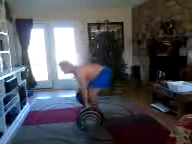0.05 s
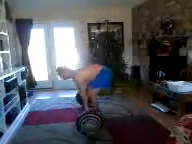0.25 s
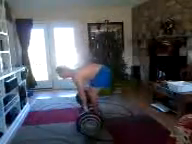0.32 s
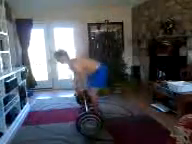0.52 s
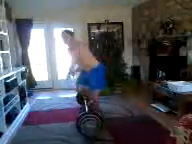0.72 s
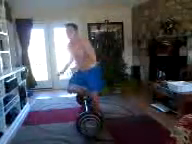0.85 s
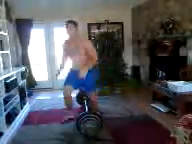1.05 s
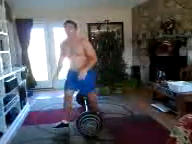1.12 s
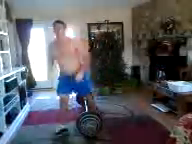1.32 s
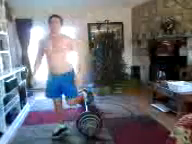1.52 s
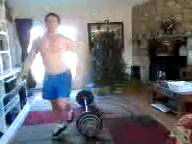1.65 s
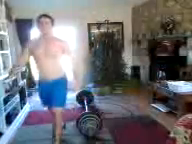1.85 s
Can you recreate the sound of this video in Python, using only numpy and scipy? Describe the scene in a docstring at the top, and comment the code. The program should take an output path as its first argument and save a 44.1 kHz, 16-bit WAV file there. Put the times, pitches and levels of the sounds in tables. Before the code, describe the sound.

A loaded barbell lands hard on a matted floor, booming as loose iron plates clatter, ring and briefly squeal, then soft footfalls and a shoe slap in a quiet living room, through a narrow, slightly overloaded microphone.

```python
"""A loaded barbell is dropped on a matted floor: its loose iron plates clash as chattering noise bursts
and ring as decaying, wavering modes, with brief squeals and dull scuffs on the sleeves.
The floor booms as damped low sines with a noise burst. A shoe slaps down among soft footfalls, also noise
bursts. Faint noise is the quiet of a live living room, whose echo is decaying noise.
A narrow-band microphone rounds off the loudest peaks; a few thin clicks are added."""
import sys
import numpy as np
from scipy import signal
from scipy.fft import rfft, irfft, next_fast_len
from scipy.io import wavfile
from scipy.ndimage import map_coordinates

SR = 44100
rng = np.random.default_rng(int(sys.argv[2]) if len(sys.argv) > 2 else 0)


def to_wav(s):
    """Save 16-bit WAV."""
    ch = np.atleast_2d(s).T  # columns
    pcm = np.round(np.clip(ch, -1, 1) * 32767)  # PCM
    wavfile.write(sys.argv[1], SR, pcm.astype(np.int16))


N = 83790
T = np.arange(N) / SR  # time in seconds


def amp(db):
    """Decibel law: level to amplitude gain."""
    return 10 ** (np.asarray(db) / 20)


def unit(x):
    """Normalisation: x scaled to rms 1."""
    return x / np.sqrt(np.mean(x ** 2) + 1e-20)


def along(points, hz):
    """Spectral envelope: (Hz, value) points interpolated on a log frequency axis."""
    f, v = np.transpose(points)
    return np.interp(np.log(hz + 1), np.log(f + 1), v)


def fade(t, t60):
    """Exponential damping: a fall of 60 dB in t60 seconds."""
    return np.exp(-np.log(1000) * t / t60)


def onset(seconds):
    """Exponential build-up: a rise from 0 towards 1 with this time constant."""
    return 1 - np.exp(-T / seconds)


def filtered(x, gain):
    """Linear filtering: the spectrum of x times a gain that depends on frequency."""
    m = next_fast_len(N + SR // 4)
    hz = np.fft.rfftfreq(m, 1 / SR)
    return irfft(rfft(x, m) * gain(hz), m)[:N]


def noise(level):
    """Coloured noise: rms 1, with a dB level that is a function of frequency."""
    return unit(filtered(rng.standard_normal(N), lambda hz: amp(level(hz))))


def at(s, x):
    """Pure delay: x starts at s seconds."""
    return np.pad(x, (max(round(s * SR), 0), 0))[:N]


def bump(hz, centre_hz, octaves):
    """Band emphasis: a bell of height 1 on log frequency."""
    return np.exp(-.5 * (np.log2((hz + 1) / centre_hz) / octaves) ** 2)


# Reverberation of the room. Each row: frequency in Hz, t60 in seconds.
ROOM_DECAY = [(70, 0.6), (200, 0.71), (550, 0.53), (1400, .56), (3600, 0.49)]
ROOM_BUILD_S = 0.00596


def in_room(x, room_db):
    """Diffuse reverberation: x plus its echo in noise whose decay time depends on frequency."""
    hz, t, z = signal.stft(rng.standard_normal(SR), SR, nperseg=256)
    decay = fade(t, along(ROOM_DECAY, hz)[:, None])
    tail = signal.istft(z * decay, SR, nperseg=256)[1][:SR]
    tail = tail * onset(ROOM_BUILD_S)[:SR]
    tail = tail / np.linalg.norm(tail)
    return x + amp(room_db) * signal.fftconvolve(x, tail)[:N]


def burst(colour, t60, room_db):
    """Impact noise: a blow without pitch, exponentially damped, in the room."""
    blow = noise(lambda hz: along(colour, hz)) * fade(T, t60)
    return in_room(blow, room_db)


def wobble(rate):
    """Random modulation: a smooth curve through random knots, rate knots a second."""
    knots = rng.standard_normal(int(N * rate / SR) + 4)
    return map_coordinates(knots, [T * rate])


WAVER_RATE, WAVER_RAD, WAVER_DB = 40, 0.59, 3.2  # knots a second, phase and level spread


def wavering(hz):
    """Amplitude and phase modulation: a slightly unsteady sine."""
    level = amp(WAVER_DB * wobble(WAVER_RATE))
    phase = 2 * np.pi * (hz * T + rng.random()) + WAVER_RAD * wobble(WAVER_RATE)
    return level * np.sin(phase)


# Spectrum of the quiet room. Each row: frequency in Hz, relative level in dB.
AIR_COLOUR = [(25, -21), (70, -8), (130, -2.5), (200, -2.5), (320, -10.5), (600, -14.5), (1100, -19),
              (2000, -22.5), (3200, -28), (4300, -40.5)]
AIR_DB = -61.5


def room_air():
    """Stationary noise: the steady, mostly low background of the room."""
    return amp(AIR_DB) * noise(lambda hz: along(AIR_COLOUR, hz))


# Soft footfalls. Each row: start in seconds, level in dB.
STEP_HITS = [(.86, -51), (1.03, -56.5), (1.115, -54), (1.309, -55), (1.59, -66), (1.73, -58.5),
             (1.808, -60)]
# Spectrum of a footfall. Each row: frequency in Hz, relative level in dB.
STEP_COLOUR = [(30, -23), (80, 10.5), (130, 15.5), (200, 2), (320, -5), (700, -15), (2000, -42),
               (4000, -48)]
STEP_T60, STEP_ROOM_DB = 0.23, -7.5  # seconds, dB


def footfalls():
    """Low-frequency impact noise: muffled steps on the mat."""
    return sum(at(s, amp(db) * burst(STEP_COLOUR, STEP_T60, STEP_ROOM_DB)) for s, db in STEP_HITS)


# Sole slapping the floor. Each row: start in seconds, level in dB.
SLAP_HITS = [(1.3815, -33), (1.398, -32), (1.417, -37.5), (1.455, -48)]
# Spectrum of a slap. Each row: frequency in Hz, relative level in dB.
SLAP_COLOUR = [(60, -34.5), (150, -16), (300, -11.5), (480, -1), (620, 1), (900, 1), (1300, -5),
               (2000, -13.5), (3300, -19.5), (4200, -29.5)]
SLAP_T60, SLAP_ROOM_DB = 0.058, -1  # seconds, dB


def shoe_slap():
    """Mid-frequency impact noise: a flat sole meets the floor in close bursts."""
    return sum(at(s, amp(db) * burst(SLAP_COLOUR, SLAP_T60, SLAP_ROOM_DB)) for s, db in SLAP_HITS)


# The weight landing on the mat. Each row: start in seconds, level in dB.
LANDING_HITS = [(0.1995, -21.5), (0.2154, -9.5), (.281, -28), (.338, -24.5), (0.387, -29), (0.439, -30.5),
                (0.497, -35.5), (.66, -44)]
# Modes of the floor boards. Each row: frequency in Hz, relative level in dB, t60 in seconds.
BOARD_MODES = [(80.7, 5, 0.13), (99.6, 3, 0.11), (218.9, 1, 0.19)]
# Spectrum of the boom. Each row: frequency in Hz, relative level in dB.
BOOM_COLOUR = [(25, -29), (50, -13), (75, -5), (110, -4), (150, -3), (215, -5.5), (320, -10.5), (600, -28)]
FLOOR_ATTACK_S = .01
BOOM_DB, BOOM_T60, BOOM_ROOM_DB = -7.5, 0.11, -1  # dB, seconds, dB


def floor():
    """Damped modal vibration: each landing swings the boards, with a soft onset and a boom of noise."""
    rise = onset(FLOOR_ATTACK_S)
    modes = sum(amp(db) * fade(T, t60) * np.sin(2 * np.pi * hz * T) for hz, db, t60 in BOARD_MODES)
    boards = rise * modes
    out = np.zeros(N)
    for s, db in LANDING_HITS:
        boom = amp(BOOM_DB) * rise * burst(BOOM_COLOUR, BOOM_T60, BOOM_ROOM_DB)
        out += at(s, amp(db) * (boards + boom))
    return out


FRICTION_RISE_S = .012  # onset of both rubs and squeals
# Plates rubbing as the bar is lowered, and as it rolls. Each row: start in seconds, level in dB.
RUB_HITS = [(.002, -44), (.048, -57.5), (.122, -51.5), (.96, -57), (1.04, -58.5), (1.14, -62.5),
            (1.305, -52.5)]
# Spectrum of a rub. Each row: frequency in Hz, relative level in dB.
RUB_COLOUR = [(100, -23), (200, -8), (420, -15.5), (540, -14), (620, 1.5), (760, -13), (1000, -7.5),
              (1250, -18), (2000, -24.5), (2700, -24.5), (4000, -35.5)]
RUB_T60, RUB_ROOM_DB = 0.33, -6  # seconds, dB


def rubs():
    """Friction noise: dull scuffs of the loose plates before and after the drop."""
    rise = onset(FRICTION_RISE_S)
    return sum(at(s, amp(db) * rise * burst(RUB_COLOUR, RUB_T60, RUB_ROOM_DB)) for s, db in RUB_HITS)


# Plates squealing on the sleeve as the bar rocks and rolls.
# Each row: start in seconds, length in seconds before the decay, frequency in Hz, level in dB.
SQUEAL_TONES = [(.305, 0.033, 1268, -27), (.543, 0.021, 1260, -21.5), (.625, .05, 1250, -36),
                (.615, 0.061, 1136, -34), (.656, 0.04, 1137, -24.5), (.622, .105, 2607, -38.5),
                (.72, 0.042, 1138, -41), (.838, .045, 1142, -46), (.942, 0.1, 1137, -54.5),
                (1.05, 0.071, 1138, -58.5), (1.17, 0.13, 1139, -68)]
SQUEAL_T60, SQUEAL_ROOM_DB = 0.16, -9.5  # seconds, dB


def squeals():
    """Friction-driven vibration: rubbing on the sleeve keeps one mode singing for a moment."""
    rise = onset(FRICTION_RISE_S)
    tones = np.zeros(N)
    for s, length, hz, db in SQUEAL_TONES:
        release = fade(np.maximum(T - length, 0), SQUEAL_T60)
        sine = np.sqrt(2) * wavering(hz)
        tones += at(s, amp(db) * rise * release * sine)
    return in_room(tones, SQUEAL_ROOM_DB)


# Plates hitting each other; ringing and clashes share these contacts.
# Each row: start in seconds, clash level in dB, ring level in dB, favoured frequency in Hz.
PLATE_CONTACTS = [(.207, -29, -47.5, 2990), (.213, -16.5, -40, 2630), (.229, -17.5, -14.5, 3050),
                  (.243, -14.5, -20, 968), (.265, -10.5, -17, 2370), (.290, -14.5, -22.5, 3100),
                  (.313, -14.5, -21.5, 1263), (.338, -20.5, -22, 1250), (.366, -16.5, -20, 2590),
                  (.378, -22, -29, 890), (.402, -11, -20, 1550), (.421, -15.5, -22.5, 2720),
                  (.456, -19, -23.5, 1620), (.497, -21, -34.5, 1636), (.522, -22.5, -26.5, 1123),
                  (.547, -29, -39.5, 1213), (.570, -29, -31.5, 2325), (.596, -27.5, -32.5, 715),
                  (.622, -26, -26.5, 1300), (.664, -29.5, -36.5, 910), (.702, -36.5, -45, 1250),
                  (.728, -38.5, -34.5, 2390), (.775, -41.5, -48.5, 1144)]
# Modes of the plates. Each row: frequency in Hz, relative level in dB, t60 in seconds.
PLATE_MODES = [(645, -16.5, .6), (767.6, -16.5, 0.39), (908.5, -10, 0.66), (1068, -11.5, .3),
               (1138, -9.5, 0.42), (1255, -8, .4), (1388, -9.5, .35), (1558, -16, .45), (1620, -11, .4),
               (1751, -14.5, .3), (1774, -16, .5), (2306, -15, .55), (2293, -13, .3), (2335, -12, .3),
               (2570, -10, .3), (2815, -17, 0.23), (3117, -19, .25), (3230, -23, .3)]
RING_ATTACK_S, RING_ROOM_DB = .004, -10
RING_FOCUS_DB, RING_FOCUS_OCT = 6.5, 0.11


def ringing():
    """Modal excitation: every contact adds energy to the plate modes, most near its favoured frequency."""
    out = np.zeros(N)
    for hz, db, t60 in PLATE_MODES:
        shape = fade(T, t60) * onset(RING_ATTACK_S)
        energy = np.zeros(N)
        for s, _, ring_db, focus_hz in PLATE_CONTACTS:
            focus_db = RING_FOCUS_DB * (bump(hz, focus_hz, RING_FOCUS_OCT) - .5)
            energy += at(s, amp(ring_db + focus_db) * shape) ** 2
        out += amp(db) * np.sqrt(energy) * wavering(hz)
    return in_room(out, RING_ROOM_DB)


# Spectrum of a clash. Each row: frequency in Hz, relative level in dB.
CLASH_COLOUR = [(60, -32), (150, -8), (220, -6.5), (380, -8.5), (600, -6.5), (900, -8), (1300, -3),
                (1950, -7.5), (2500, -6.5), (3200, -10), (4200, -18.5)]
CLASH_T60, CLASH_ROOM_DB = 0.038, 2  # seconds, dB
CHATTER_S, CHATTER_LOSS_DB = .005, 1.5  # mean gap between blows, energy weight lost per blow
FOCUS_DB, FOCUS_OCT = 8.5, .25  # each contact favours one region of the spectrum
DULL_HZ, DULL_DB_PER_DB, HARD_DB = 3570, 2.36, -21.5  # contacts softer than HARD_DB lose their top
RIPPLE_HZ, RIPPLE_DB = 14, 2  # the many close, weak modes of the stack
GRAIN_RATE, GRAIN_DB = 700, 3  # knots a second, level spread


def clashes():
    """Repeated impact: each contact is a gritty chatter of iron; soft ones lose treble."""
    knots = rng.standard_normal(size=400)

    def body(hz):
        ripple = np.interp(hz / RIPPLE_HZ, np.arange(len(knots)), knots)
        return along(CLASH_COLOUR, hz) + RIPPLE_DB * ripple

    out = np.zeros(N)
    for s, clash_db, _, focus_hz in PLATE_CONTACTS:
        gaps = CHATTER_S * rng.uniform(.5, 1.5, size=3)
        lags = np.cumsum(gaps) - gaps[0]  # the first blow is immediate
        blow_energy = fade(T, CLASH_T60) ** 2
        energy = sum(amp(-CHATTER_LOSS_DB * k) * at(lag, blow_energy) for k, lag in enumerate(lags))
        dull_db = DULL_DB_PER_DB * min(clash_db - HARD_DB, 0)

        def colour(hz):
            focus = FOCUS_DB * bump(hz, focus_hz, FOCUS_OCT)
            return body(hz) + focus + dull_db * bump(hz, DULL_HZ, octaves=0.22)

        iron = noise(colour)
        gritty = unit(iron * amp(GRAIN_DB * wobble(GRAIN_RATE)))
        clash = np.sqrt(energy) * gritty
        out += at(s, amp(clash_db) * in_room(clash, CLASH_ROOM_DB))
    return out


def scene():
    """Superposition: barbell, floor and feet over the quiet of the room."""
    barbell = rubs() + clashes() + ringing() + squeals()
    feet = shoe_slap() + footfalls()
    return (barbell + floor() + feet + room_air())[None]


# Response of the microphone. Each row: frequency in Hz, gain in dB.
MIC_RESPONSE = [(3000, 1.5), (3400, 0.5), (3800, -6.5), (4150, -11.5), (4450, -28), (4750, -80.5)]
# Thin overload clicks. Each row: start in seconds, level in dB.
CLICK_HITS = [(0.2293, -16.5), (.2395, -41.5), (.2485, -47.5), (0.287, -29), (0.4109, -14.5)]
# Spectrum of a click. Each row: frequency in Hz, gain in dB.
CLICK_COLOUR = [(2000, -30.5), (4500, 8.5), (7000, -1), (11000, -7), (15500, -20)]
LOW_CUT_HZ, TOP_HZ = 50, 15800
OVERLOAD = .65  # amplitude limit of the rounded peaks


def record(dry):
    """Saturation and band-limiting: rumble is cut, peaks rounded, treble removed and clicks added."""
    low_cut = signal.butter(2, LOW_CUT_HZ, "high", fs=SR, output="sos")
    lean = signal.sosfilt(low_cut, dry[0])
    squashed = lean / (1 + np.abs(lean / OVERLOAD) ** 6) ** (1 / 6)
    narrow = filtered(squashed, lambda hz: amp(along(MIC_RESPONSE, hz)))
    impulses = sum(at(s, amp(db) * (T == 0)) for s, db in CLICK_HITS)
    clicks = filtered(impulses, lambda hz: amp(along(CLICK_COLOUR, hz)))
    return filtered(narrow + clicks, lambda hz: hz < TOP_HZ)[None]


dry = scene()
out = record(dry)
to_wav(out)
```